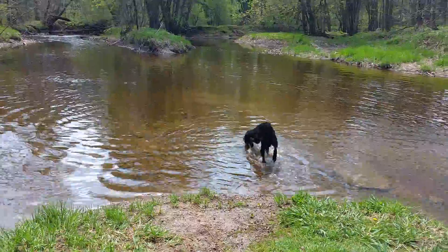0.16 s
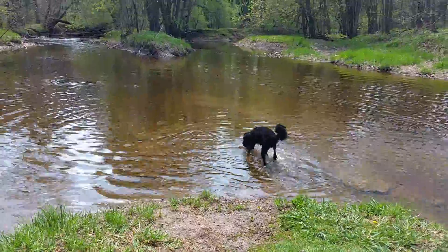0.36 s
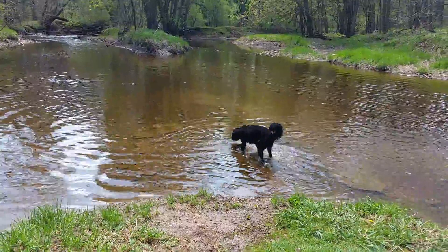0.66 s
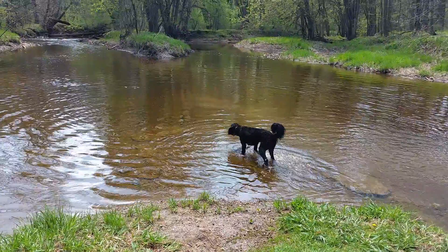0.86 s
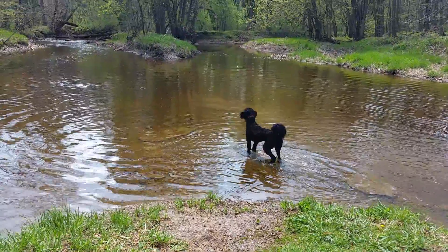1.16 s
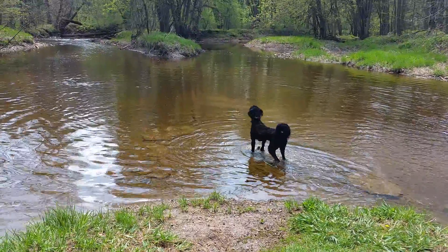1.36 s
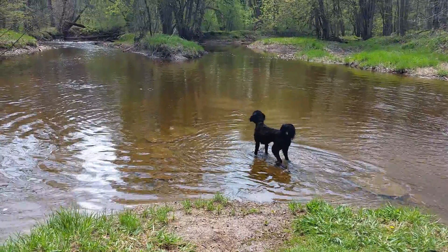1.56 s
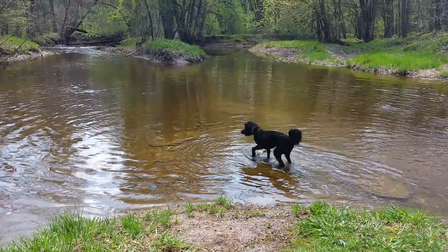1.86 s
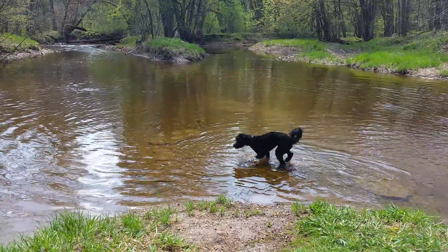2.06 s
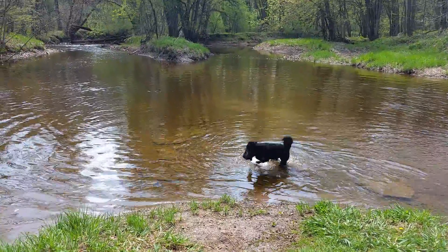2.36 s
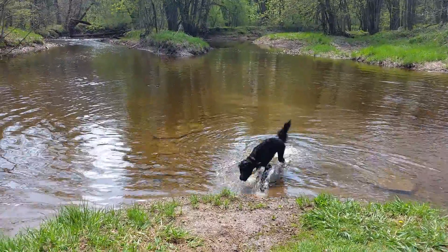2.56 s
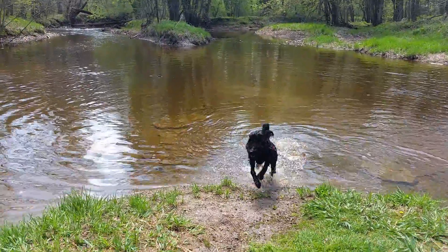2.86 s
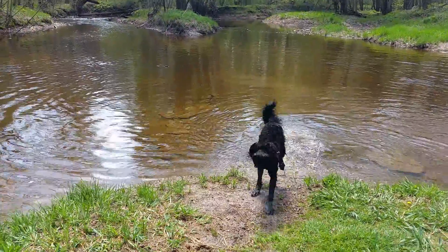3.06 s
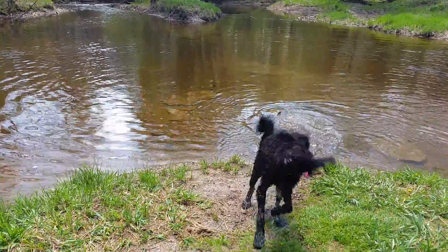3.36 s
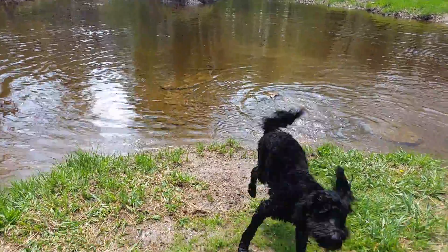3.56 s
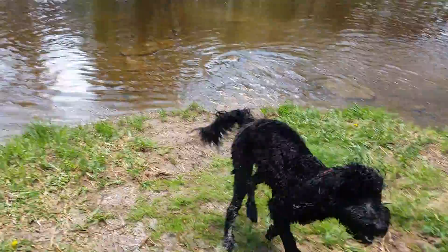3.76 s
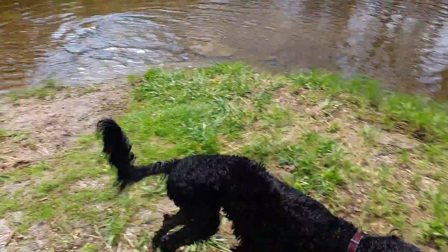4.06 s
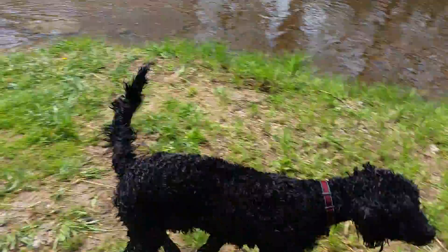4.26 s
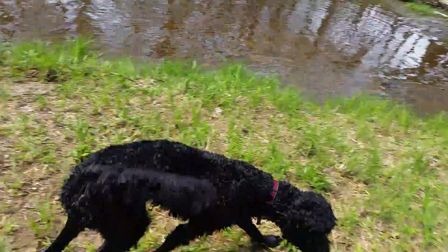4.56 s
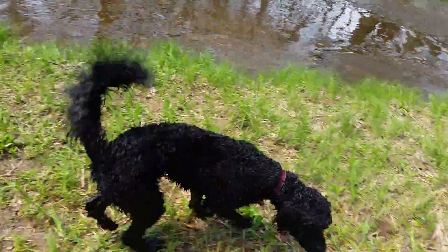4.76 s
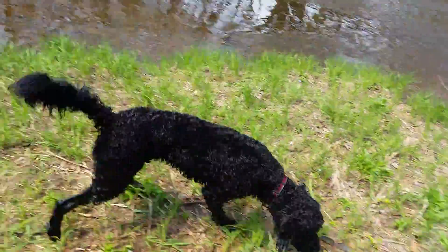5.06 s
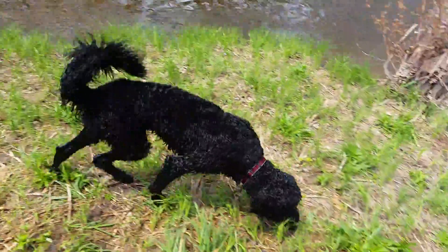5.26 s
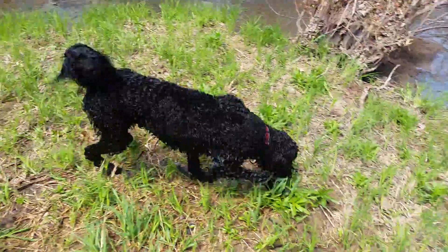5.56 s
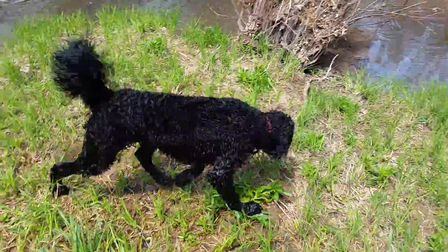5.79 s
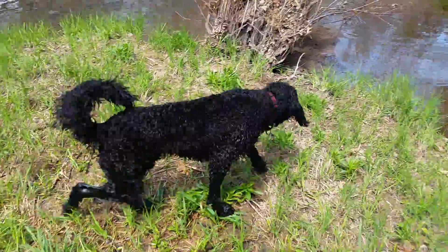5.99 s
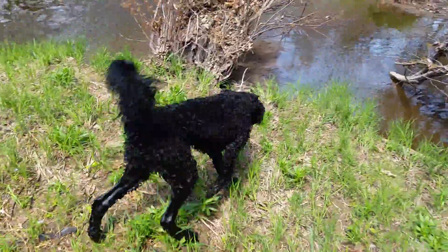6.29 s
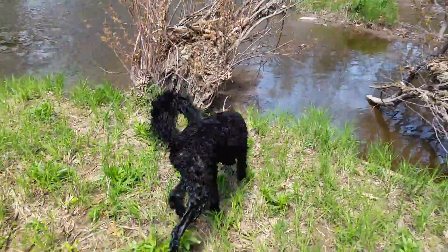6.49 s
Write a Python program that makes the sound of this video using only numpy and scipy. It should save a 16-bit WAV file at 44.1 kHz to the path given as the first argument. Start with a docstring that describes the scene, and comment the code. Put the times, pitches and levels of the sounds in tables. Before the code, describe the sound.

A dog sloshes through a shallow creek, bounds out splashing, trots over wet grass with collar tags jingling, then wind rumbles on the microphone.

```python
"""A dog wades in a shallow creek close to the microphones, bounds out and trots over wet grass, dripping.
Water sounds are bubbles and shaped noise; the two collar tags ring in short, damped modes.
Stalks snap and drops knock on the camera; behind run the creek, a distant drone and a faint whistle.
At the end a gust, made of low noise and pressure swings, buffets the ports, mostly the left one."""
import sys
import numpy as np
from scipy import signal
from scipy.fft import rfft, irfft, next_fast_len
from scipy.io import wavfile
from scipy.ndimage import map_coordinates

SR = 44100
rng = np.random.default_rng(int(sys.argv[2]) if len(sys.argv) > 2 else 0)


def transcribe(u):
    """Save the signal u as a 16-bit wav file named by the first command-line argument.

    u: samples, shape (n,) or (channels, n), limited to [-1, 1]; the rate is SR.
    q: integer samples, one column per channel.
    """
    v = np.clip(np.atleast_2d(u).T, -1, 1)
    q = np.round(v * 32767).astype(np.int16)
    wavfile.write(sys.argv[1], SR, q)


N = 292368


# How hard the legs work the water: ambling, standing, bounding out.
# Each row: time in seconds, relative slosh level in dB.
LEG_EFFORT = [(0, -45.5), (0.5, -49.5), (0.8, -54), (2.13, -55), (2.27, -43.5), (2.55, -41.5),
              (3.05, -41.5), (3.3, -47), (4.8, -64.5)]
# Water heaving round the dog's body. Each row: time in seconds, level in dB.
BODY_HEAVE = [(0, -50.5), (1.8, -46.5), (2.5, -37), (3.1, -46), (4.3, -45), (4.8, -64)]
# Colour of the churned water. Each row: frequency in Hz, relative density in dB.
CHURN_SPECTRUM = [(200, -10), (390, -8), (560, 0.5), (800, -7), (1500, -4.5), (2250, -10.5), (2900, -13.5),
                  (4800, 2.5), (9000, -71)]
# How alike nearby water sounds at the two ports. Each row: frequency in Hz, likeness from 0 to 1.
NEAR_LIKENESS = [(700, 1), (1400, 0.37), (3100, 0.5), (6000, .05)]


def wading():
    """Dragging legs make a froth of short bubbles and a few clear ones on churning noise, over a low heave."""
    slosh_db, = curves(LEG_EFFORT)
    heave_db, = curves(BODY_HEAVE)
    froth = np.array([
        grains(count=4500, size=700, hz=1294, octaves=0.902, cycles=3.9, spread_db=0.0, rise=0.023)
        for _ in range(2)])
    water = froth + 0.9 * noise()
    clear_bubbles = grains(count=1200, size=1100, hz=1200, octaves=0.55, cycles=6, spread_db=2, rise=0.05)
    water[0] += 0.8 * clear_bubbles
    surges = amp(1.6 * wobble(35))
    churn = amp(slosh_db + 1) * surges * coloured(water, CHURN_SPECTRUM, NEAR_LIKENESS)
    heave_spectrum = [(80, -9.5), (135, -5.0), (215, -9.0), (330, -16), (1100, -110)]
    heave = amp(heave_db) * coloured(noise(), heave_spectrum, NEAR_LIKENESS)
    return churn + heave


# Paws plunging in close by. Each row: start in seconds, relative level in dB, cavity pitch in Hz.
PAW_PLUNGES = [(0.022, -15, 760), (0.568, -21, 1280), (0.676, -24.5, 990), (1.117, -32, 2000),
               (1.332, -27, 1540), (2.1, -23, 580), (2.228, -23, 594), (2.253, -25, 477), (2.287, -25, 530),
               (2.397, -22, 620), (2.459, -20.5, 563), (2.495, -19, 556), (2.527, -19.5, 605),
               (2.57, -21.5, 640), (2.584, -25, 960), (2.668, -24, 1000), (2.723, -19.5, 580),
               (2.746, -15.5, 2150), (2.851, -21.5, 694), (2.866, -20, 1460), (2.921, -21, 553),
               (2.937, -17, 2070), (2.947, -21, 1520), (3.057, -21.5, 966), (3.424, -20, 933)]


def plunges():
    """Each paw slaps the surface and opens a cavity that gulps shut and sheds smaller bubbles."""
    water, t = np.zeros(N), np.arange(SR // 12) / SR
    slap = np.exp(-t / 0.006)
    for s, db, hz in PAW_PLUNGES:
        gulp = bubble(t, hz, cycles=4.8, rise=0.05)
        add(water, s, amp(db - 5) * gulp)
        add(water, s, amp(db - 14.5) * slap * rng.standard_normal(len(t)))
        shed_hz = (hz * hz * 1300) ** (1 / 3)  # the cavity pitch drawn towards 1300 Hz
        for _ in range(9):
            late = rng.exponential(0.007)
            pitch = shed_hz * np.exp(0.3 * rng.standard_normal())
            small = rng.random() * bubble(t, pitch, cycles=4, rise=0.04)
            add(water, s + late, amp(db - 14.5) * small)
    return filtered(water, lambda hz: 1 / (1 + 1j * hz / 2400 - (hz / 2400) ** 2))  # low-pass


# Water trickling off a lifted leg. Each row: start in seconds, level in dB, length in seconds.
LEG_TRICKLES = [(0.125, -53, 0.02), (1.1, -56, 0.019), (1.22, -53, 0.025), (2.36, -49, 0.049)]
# Colour of the trickle. Each row: frequency in Hz, relative density in dB.
TRICKLE_SPECTRUM = [(600, -18), (1300, -4), (2000, -2), (2500, -7), (3200, -32)]


def trickles():
    """Thin streams run back into the creek as many small bubbles."""
    level = np.sqrt(swells(LEG_TRICKLES, rise=0.015, fall=0.028))
    beads = np.array([
        grains(count=4000, size=400, hz=1800, octaves=0.38, cycles=2.2, spread_db=3.5, rise=0.029)
        for _ in range(2)])
    return level * coloured(beads, TRICKLE_SPECTRUM, NEAR_LIKENESS)


# Water kicked up and raining back. Each row: start in seconds, relative level in dB, length in seconds.
RAINING_SPLASHES = [(0.32, -52, 0.13), (0.58, -48.5, 0.013), (1.31, -58, 0.043), (2.195, -51.5, 0.023),
                    (2.4, -45, 0.026), (2.62, -39.5, 0.12), (2.74, -35.5, 0.24), (3.09, -38.5, 0.11)]
# Strides through wet grass. Each row: start in seconds, relative level in dB, length in seconds.
GRASS_STRIDES = [(3.42, -39, 0.13), (3.92, -34, 0.016), (3.988, -32, 0.017), (4.07, -40.5, 0.1),
                 (4.29, -37.5, 0.023), (4.39, -44, 0.11), (4.62, -43, 0.023), (5.0, -54.5, 0.19),
                 (5.69, -40.5, 0.12), (5.97, -51, 0.021), (6.14, -51.5, 0.18), (6.36, -47, 0.076)]


def patter_level():
    """Spray from the legs, single splashes, the draining coat and strides add in power, giving dB."""
    spray_db, full_effort_db, spray_growth = -44.5, -40, 1.94  # growth: dB of spray per dB of effort
    soaked_s, soaked_rise_s, drip_db, drain_db_per_s = 3.05, 0.13, -43, 5  # the coat streams, then drains
    effort_db, = curves(LEG_EFFORT)
    spray = amp(spray_db + spray_growth * (effort_db - full_effort_db))
    drain_s = 20 / np.log(10) / drain_db_per_s  # time to fall by a factor e
    coat = amp(drip_db) * swell(soaked_s, 0, soaked_rise_s, drain_s)
    splash_power = swells(RAINING_SPLASHES, rise=0.03, fall=0.049)
    stride_power = swells(GRASS_STRIDES, rise=0.024, fall=0.035)
    return 10 * np.log10(spray ** 2 + coat ** 2 + splash_power + stride_power)


# Colour of flying water, for patter and spats. Each row: frequency in Hz, relative level in dB.
SPRAY_SPECTRUM = [(1200, -5), (2200, -8.5), (3100, -21.5), (4900, -8), (6300, -13), (8500, -5),
                  (10000, -11.5), (11200, 0.5), (12500, 6), (14500, 1)]


def patter():
    """Countless tiny impacts, in crackling clumps, with pinging droplets among them."""
    fine = np.array([
        grains(count=5000, size=64, hz=8060, octaves=0.8, cycles=0.28, spread_db=-1, rise=0)
        for _ in range(2)])
    pings = np.array([
        grains(count=1500, size=200, hz=8500, octaves=0.5, cycles=6, spread_db=2.2, rise=0)
        for _ in range(2)])
    drops = 0.7 * fine + 0.7 * pings + 0.8 * noise()
    clumps = np.sqrt(0.55 + 0.45 * crackle(count=1300, decay_s=0.003, spread_db=3.3) ** 2)
    level = amp(patter_level() + 5.0 + 1.3 * wobble(45))
    return level * clumps * coloured(drops, SPRAY_SPECTRUM)


# Thrown water smacking back down. Each row: start in seconds, relative level in dB.
WATER_SPATS = [(0.025, -24), (0.26, -29.5), (0.41, -33), (0.569, -33), (0.679, -31.5), (1.259, -36),
               (1.341, -35), (2.613, -16.5), (2.725, -15), (2.787, -16), (2.851, -7.5), (2.9219, -7),
               (3.012, -18), (3.121, -20), (3.21, -18.5), (3.269, -21), (3.34, -21)]


def spats():
    """A gob of thrown water lands with a sharp, bright smack."""
    out, t = np.zeros((2, N)), np.arange(SR // 40) / SR
    rise_s, fall_s = 0.0003, 0.003
    life = (1 - np.exp(-t / rise_s)) * np.exp(-t / fall_s)
    for s, db in WATER_SPATS:
        add(out, s, amp(db - 3) * life * rng.standard_normal((2, len(t))))
    return filtered(out, lambda hz: amp(along(SPRAY_SPECTRUM, hz)))


def touches(count):
    """Light, chance contacts of the tags, weaker as the trot goes on: (s, relative dB, hold s)."""
    start, end = 2.7, 6.6  # s
    level_db, fade_db_per_s, scatter_db, hold_s = -33, 3, 0.5, 0.024
    late = rng.random(count) * (end - start)
    level = level_db - fade_db_per_s * late + scatter_db * rng.standard_normal(count)
    return [(start + s, db, hold_s) for s, db in zip(late, level)]


# Collar tags striking each other.
# Each row: start in seconds, relative level in dB, ringing time before they damp each other in seconds.
TAG_CLASHES = [(3.269, -21, 0.025), (3.393, -12, 0.013), (3.4386, -17.5, 0.0078), (3.5184, -13.5, 0.0081),
               (3.6104, -17, 0.02), (3.647, -18, 0.025), (3.698, -13.5, 0.012), (3.8028, -24, 0.027),
               (3.836, -12, 0.0035), (3.9165, -15.5, 0.015), (4.1588, -20.5, 0.027), (4.1835, -23, 0.053),
               (4.3774, -21, 0.012), (4.4393, -28, 0.013), (4.568, -23.5, 0.013), (4.617, -23.5, 0.018),
               (4.663, -18.5, 0.013), (4.8496, -23.5, 0.015)]
# Ringing modes of the two tags. Each row: frequency in Hz, relative level in dB.
TAG_MODES = [(10680, 6), (10800, 2), (15340, -5), (15490, -4)]


def tags():
    """The tags clash, ring and damp each other; they touch once more, and a weak free ring lingers."""
    out, t = np.zeros((2, N)), np.arange(SR // 6) / SR
    hz, level = np.transpose(TAG_MODES)[:, :, None]
    for s, db, hold in list(TAG_CLASHES) + touches(count=17):
        pitch = hz + 40 * rng.standard_normal(hz.shape)
        # contact blurs the phase
        chatter = np.cumsum(rng.standard_normal((len(hz), len(t))), axis=1) * np.sqrt(200 / SR)
        # the swinging tags reach each port in another phase
        phase = 2 * np.pi * rng.random((2, len(hz), 1))
        strength = amp(level + 2.0 * rng.standard_normal(phase.shape))
        modes = strength * np.sin(2 * np.pi * pitch * t + phase + chatter)
        clash = np.exp(-(t / max(hold, 0.003)) ** 1.8)
        touch = amp(-15) * np.exp(-((t - rng.uniform(0.018, 0.05)) / 0.004) ** 2)
        free_ring = amp(-27 - 60 * t / 0.15)
        life = (clash + touch + free_ring) * (1 - np.exp(-t / 0.0008))
        # the rims rub while they touch
        scrape = amp(-20.5) * clash * np.diff(rng.standard_normal((2, len(t) + 1)))
        add(out, s, amp(db - 2.0) * (life * unit(modes.sum(axis=1)) + scrape))
    return out


# Stalks snapping under the paws close by. Each row: time in seconds, relative level in dB, pitch in Hz.
STALK_SNAPS = [(3.415, -17.5, 10400), (3.489, -8.5, 12900), (3.5174, -10.5, 6900), (3.603, -14, 11200),
               (3.6853, -15, 5360), (3.897, -18, 6400), (3.9914, -15, 5150), (4.0221, -7, 5290),
               (4.16, -11, 10250), (4.7157, -17.5, 4650), (4.884, -34, 2400), (5.0463, -30.5, 5500),
               (5.549, -29.5, 12700), (5.674, -32.5, 2160), (5.804, -29, 2250)]


def ticks():
    """A pitched snap with a few side resonances, inside a short flick of spatter that swells and fades."""
    out, t = np.zeros((2, N)), np.arange(SR // 25) / SR
    lead = 1 / 100  # s from the start of the flick to its peak
    away = np.abs(t - lead) * np.where(t < lead, 2, 1)  # the swell is quicker than the fade
    flick = np.exp(-away / 0.0021) + amp(-9) * np.exp(-away / 0.008)
    for s, db, hz in STALK_SNAPS:
        add(out, s + 0.001104 - lead, amp(db - 13.5) * flick * rng.standard_normal((2, len(t))))
        add(out, s + 0.0009, amp(db - 4) * bubble(t, hz, cycles=8.3, rise=0))
        for late, side_hz in zip(rng.uniform(0, 0.003, 4), rng.uniform(1500, 7500, 4)):
            add(out, s + late, amp(db - 15) * bubble(t, side_hz, cycles=9.6, rise=0))
    colour = [(300, -13), (1500, -1), (3100, -11), (4800, 0.0), (15000, 3)]
    return filtered(out, lambda hz: amp(along(colour, hz)))


# Drops hitting the camera, right at the microphones. Each row: time in seconds, relative level in dB.
CAMERA_DROPS = [(3.489, -24), (4.413, -16), (4.455, -24.5), (4.716, -26)]
# Modes of the camera body. Each row: frequency in Hz, relative level in dB, 60 dB decay time in seconds.
CAMERA_MODES = [(840, -11.5, 0.016), (1230, 2.5, 0.0067), (2180, 5, 0.0022), (3880, -3, 0.005)]


def taps():
    """Drops land on the camera: a dead knock of its quickly damped body modes."""
    out, t = np.zeros(N), np.arange(SR // 40) / SR
    knock = sum(amp(db - 60 * t / t60) * np.sin(2 * np.pi * hz * t) for hz, db, t60 in CAMERA_MODES)
    for s, db in CAMERA_DROPS:
        add(out, s + 0.00057, amp(db - 2.5) * knock)
    return out


# The wind freshening at the ports. Each row: time in seconds, strength in dB at the left port.
BREEZE_STRENGTH = [(0, -56), (2.7, -51), (2.95, -41.5), (4.3, -45), (5.0, -56), (5.12, -39.5), (5.9, -27),
                   (6.63, -26)]
# Gusts on the ports. Each row: start in seconds, length in seconds, left level in dB, right level in dB.
PORT_GUSTS = [(3.558, 0.057, -32, -33), (5.921, 0.021, -27, -19.5), (5.999, 0.067, -11, -33),
              (6.15, 0.051, -19, -18.5), (6.27, 0.079, -13, -36), (6.425, 0.053, -12, -34),
              (6.507, 0.11, -13, -37)]


def wind_force():
    """Left and right: an unsteady breeze with gusts on top, summed in power."""
    breeze_db, = curves(BREEZE_STRENGTH)
    right_extra_db = 2  # the breeze is stronger on the right
    side_db = np.array([[0], [right_extra_db]])
    unsteady_db = 2.3 * np.array([wobble(8.6), wobble(6.3)])
    breeze = amp(breeze_db + side_db + unsteady_db)
    s, length, *ports_db = np.transpose(PORT_GUSTS)
    gusts = np.array([swells(zip(s, db, length), rise=0.017, fall=0.039) for db in ports_db])
    return np.sqrt(breeze ** 2 + gusts)


# Low rumble of wind on a port. Each row: frequency in Hz, relative density in dB.
BUFFET_SPECTRUM = [(15, -31), (35, -8), (75, -1), (120, -5), (200, -17), (350, -43), (800, -83)]
# Faster eddies at a port. Each row: frequency in Hz, relative density in dB.
EDDY_SPECTRUM = [(40, -26.5), (120, 3), (210, 1.5), (400, -17), (700, -34), (1300, -56), (4000, -90)]


def wind():
    """Each port is buffeted on its own; a harder gust sheds faster eddies, in sharp bursts."""
    force = wind_force()
    rumble = force * coloured(noise(), BUFFET_SPECTRUM)
    bursts = amp(2.2 * wobble(90))
    hardness = np.minimum(force / amp(-10.5), 1) ** 1.1
    eddies = force * hardness * amp(-2.5) * bursts * coloured(noise(), EDDY_SPECTRUM)
    return rumble + eddies


# Single eddies slapping the left port.
# Each row: centre time in seconds, relative level in dB, width in seconds.
EDDY_SLAPS = [(5.995, -18.5, 0.00083), (6.046, -13, 0.00098), (6.083, -17, 0.00066), (6.294, -20, 0.0015),
              (6.318, -15, 0.0014), (6.357, -8.5, 0.0014), (6.452, -18.5, 0.00065), (6.473, -9.5, 0.0011),
              (6.54, -5, 0.0017), (6.591, -9.5, 0.0014)]


def slaps():
    """An eddy that hits the left port squarely gives one short swing of pressure with a sharp tip."""
    out, t = np.zeros((2, N)), np.arange(N) / SR
    swing = lambda u: (1 - 2 * u ** 2) * np.exp(-u ** 2)
    for s, db, width in EDDY_SLAPS:
        u = (t - s) / width
        out[0] += amp(db - 1) * (swing(u) + 0.2 * swing(2 * u))
    return out


# A faint, thin whistle far off. Each row: time in seconds, pitch in Hz, relative level in dB.
FAR_WHISTLE = [(1.46, 12100, -73), (1.53, 12800, -61), (1.58, 12550, -63), (1.63, 13150, -58),
               (1.74, 12350, -61), (1.85, 11950, -64), (1.95, 11800, -72)]


def whistle():
    """A wavering high tone with a weaker companion above it."""
    hz, db = curves(FAR_WHISTLE)
    t = np.arange(N) / SR

    def tone(ratio):
        wavering_hz = ratio * hz + 70 * wobble(120) + 60 * wobble(20)
        return np.sin(2 * np.pi * np.cumsum(wavering_hz) / SR)
    sounding = (t > FAR_WHISTLE[0][0]) * (t < FAR_WHISTLE[-1][0])
    return amp(db - 1.5) * sounding * (tone(1) + 0.65 * tone(1.1))


# Colour of the creek running behind the dog. Each row: frequency in Hz, relative density in dB.
CREEK_SPECTRUM = [(43, -40), (54, -2), (147, -4.5), (171, -11.5), (338, -11.5), (387, -17.5), (1000, -23),
                  (2600, -51), (4000, -85)]
# How alike far sounds are at the two ports. Each row: frequency in Hz, likeness from 0 to 1.
FAR_LIKENESS = [(180, 1), (550, 0.49), (1650, 0)]


def creek():
    """The creek runs on as low noise whose level wavers slightly."""
    return amp(-41.5 + 0.36 * wobble(5.95)) * coloured(noise(), CREEK_SPECTRUM, FAR_LIKENESS)


# A drone and a soft rush in the distance.
# Each row: time in seconds, relative low drone level in dB, higher drone level in dB, rush level in dB.
DISTANT_LEVELS = [(0, -45.5, -52, -59.5), (1.4, -40, -54.5, -60), (2, -47, -58, -61.5),
                  (4.2, -43, -47, -54.5), (4.8, -58, -54.5, -61), (5.3, -40, -46, -52.5),
                  (6.63, -47, -57, -61)]


def distance():
    """Two narrow bands of noise make a distant drone, a broad one a soft rush."""
    low_db, higher_db, rush_db = curves(DISTANT_LEVELS)
    low_band = [(48, -68), (67, -5.0), (74, 8.0), (130, -130)]
    higher_band = [(200, -73), (280, -11.0), (340, 1.5), (520, -120)]
    rush_band = [(300, -6), (1100, -6.0), (1600, -1.5), (2080, -1.5), (2400, -15.0), (6500, -100)]
    low = amp(low_db - 2) * coloured(noise(), low_band, FAR_LIKENESS)
    higher = amp(higher_db) * coloured(noise(), higher_band, FAR_LIKENESS)
    rush = amp(rush_db) * coloured(noise(), rush_band)
    return low + higher + rush


# Colour of the even hiss. Each row: frequency in Hz, relative density in dB.
HISS_SPECTRUM = [(2200, 0), (3100, -3.5), (3700, 9), (4500, 12), (5300, 7.5), (6200, -18.5), (7800, -33),
                 (10000, -37), (12500, -1), (15500, -16)]


def hiss():
    """A steady, faint noise, unrelated at the two ports."""
    return amp(-56) * coloured(noise(), HISS_SPECTRUM)


def amp(db):
    """Decibels to gain."""
    return 10 ** (np.asarray(db) / 20)


def unit(x):
    """Scale to rms 1."""
    return x / np.sqrt(np.mean(x ** 2) + 1e-20)


def along(points, hz):
    """(Hz, value) points read on a log axis."""
    f, v = np.transpose(points)
    return np.interp(np.log(hz + 1), np.log(f), v)


def curves(rows):
    """One value per sample for each column after the time."""
    s, *cols = np.transpose(rows)
    return [np.interp(np.arange(N) / SR, s, c) for c in cols]


def wobble(rate):
    """A smooth random curve, rate knots a second."""
    knots = rng.standard_normal(int(N * rate / SR) + 4)
    return map_coordinates(knots, [np.arange(N) * rate / SR])


def filtered(x, response):
    """x times a response of frequency."""
    size = next_fast_len(N + SR // 4)
    return irfft(rfft(x, size) * response(np.fft.rfftfreq(size, 1 / SR)), size)[..., :N]


def add(track, s, sound):
    """Mix a sound into a track at time s."""
    room = track[..., max(round(s * SR), 0):][..., :sound.shape[-1]]
    room += sound[..., :room.shape[-1]]


def noise():
    """Two unrelated white noises."""
    return rng.standard_normal((2, N))


def coloured(pair, spectrum, alike=((100, 0),)):
    """Two unrelated signals become stereo of rms 1 with this spectrum and left-right likeness."""
    def mid_side(hz):
        turn = np.arccos(np.clip(along(alike, hz), -1, 1)) / 2
        return amp(along(spectrum, hz)) * np.array([np.cos(turn), np.sin(turn)])
    mid, side = filtered(pair, mid_side)
    return unit(np.array([mid + side, mid - side]))


def bubble(t, hz, cycles, rise):
    """A bubble rings for a few cycles; its pitch rises as it nears the surface, unless rise is 0."""
    age = t * hz / cycles
    tone = np.sin(2 * np.pi * hz * t * (1 + rise * np.minimum(age, 2) / 2))
    return tone * np.exp(-age) * (1 - np.exp(-2 * t * hz))


def grains(count, size, hz, octaves, cycles, spread_db, rise):
    """A random cloud of bubbles, their strengths spread by spread_db, at rms 1."""
    start = rng.integers(0, N, count)
    pitch = np.minimum(hz * 2 ** (octaves * rng.standard_normal((count, 1))), SR / 3)
    strength = amp(spread_db * np.minimum(rng.exponential(size=(count, 1)), 4))
    waves = strength * bubble(np.arange(size) / SR, pitch, cycles, rise)
    places = (start[:, None] + np.arange(size)).ravel()
    return unit(np.bincount(places, waves.ravel(), N + size)[:N])


def crackle(count, decay_s, spread_db):
    """An envelope of rms 1: clumps of drops land at random, each starting at once and dying in a few ms."""
    strength = amp(spread_db * np.minimum(rng.exponential(size=count), 3.5))
    hits = np.bincount(rng.integers(0, N, count), strength ** 2, N)
    power = signal.lfilter([1], [1, -np.exp(-2 / (decay_s * SR))], hits)
    return unit(np.sqrt(power))


def swell(s, hold, rise, fall):
    """An envelope that rises to 1 at time s, holds and dies away."""
    t = np.arange(N) / SR - s
    return np.exp(-(np.minimum(t, 0) / rise) ** 2 - np.maximum(t - hold, 0) / fall)


def swells(rows, rise, fall):
    """The summed power of (s, dB, length s) swells."""
    return sum((amp(db) * swell(s, hold, rise, fall)) ** 2 for s, db, hold in rows)


def scene():
    """Dog, wind at the ports and the creek's surroundings."""
    water = wading() + plunges() + trickles() + patter() + spats()
    close = tags() + ticks() + taps()
    gusty = wind() + slaps()
    far = whistle() + creek() + distance() + hiss()
    return water + close + gusty + far


# The two microphone ports hear differently. Each row: frequency in Hz, left-to-right ratio in dB.
PORT_BALANCE = [(100, 0.5), (380, 3.5), (700, 5), (1300, 8), (2400, 8), (4400, 18.5), (8000, 20.5),
                (10700, 2.5), (12500, -3), (15000, -9)]


def record(dry):
    """Each port colours the sound; peaks are rounded off and the band is limited."""
    top_hz = 15900

    def ports(hz):
        ratio = amp(along(PORT_BALANCE, hz))
        return np.array([2 * ratio, 2 + 0 * ratio]) / (1 + ratio)
    heard = filtered(dry, ports)
    rounded = heard / (1 + heard ** 6) ** (1 / 6)
    return filtered(rounded, lambda hz: 1 / (1 + (hz / top_hz) ** 160))


dry = scene()
out = record(dry)
transcribe(out)
```